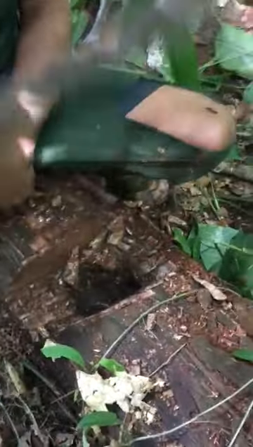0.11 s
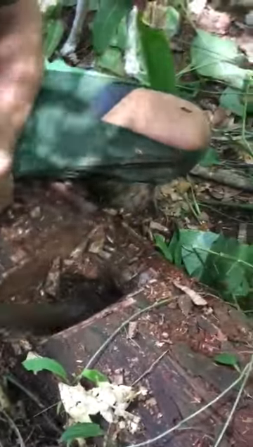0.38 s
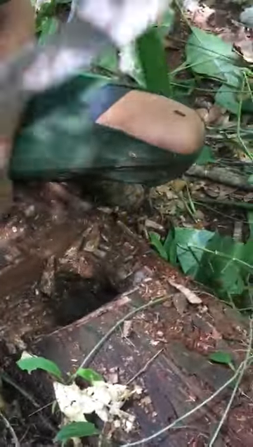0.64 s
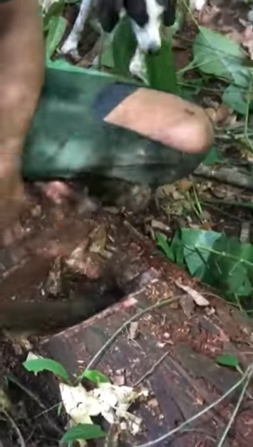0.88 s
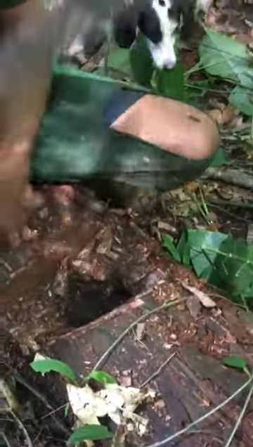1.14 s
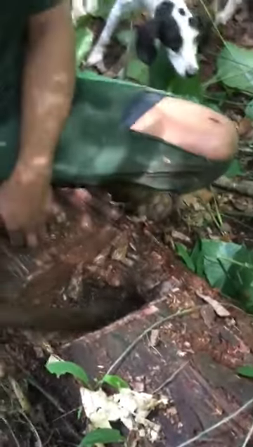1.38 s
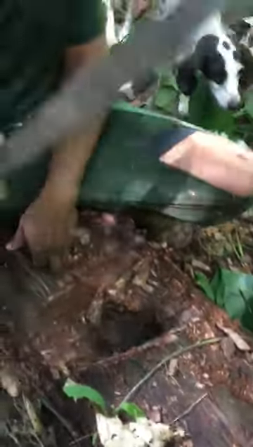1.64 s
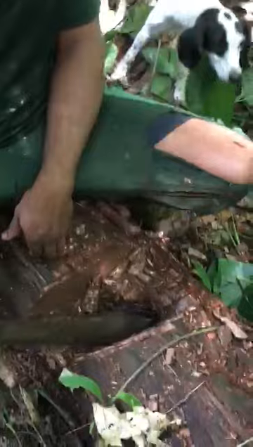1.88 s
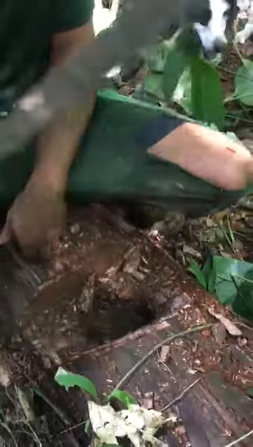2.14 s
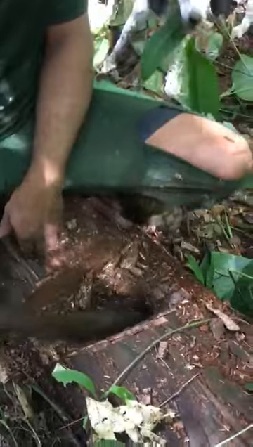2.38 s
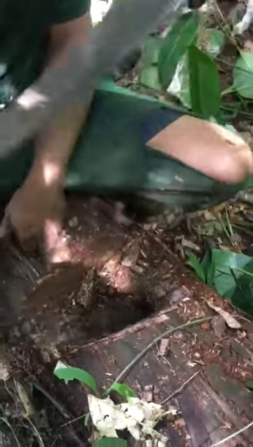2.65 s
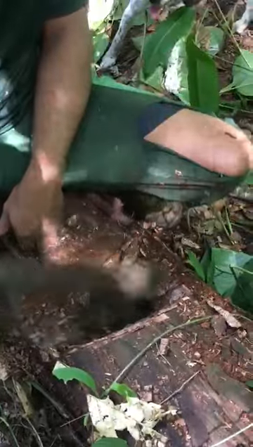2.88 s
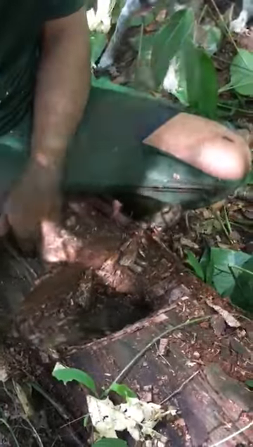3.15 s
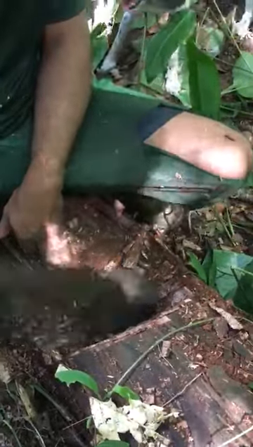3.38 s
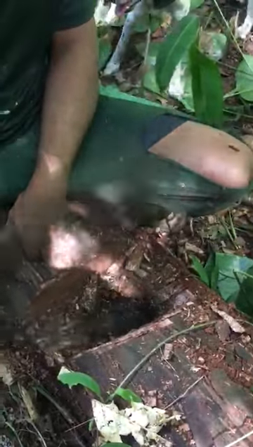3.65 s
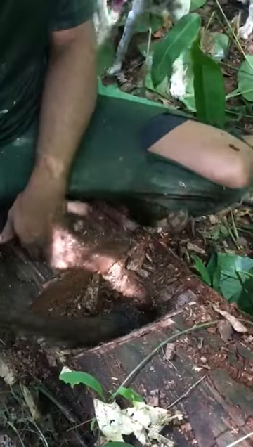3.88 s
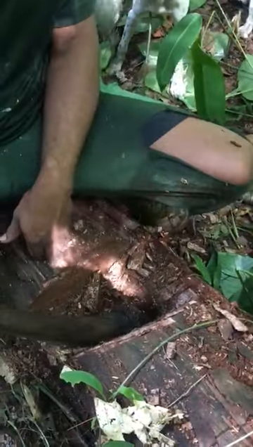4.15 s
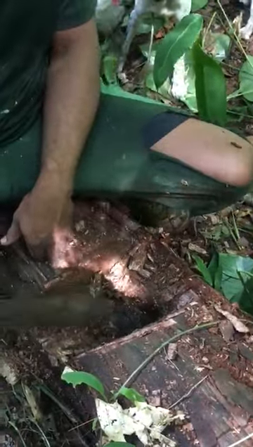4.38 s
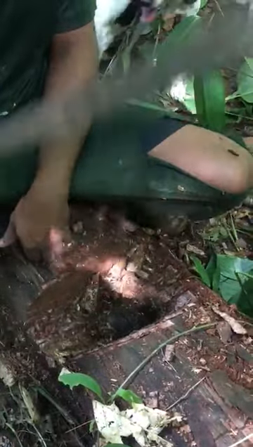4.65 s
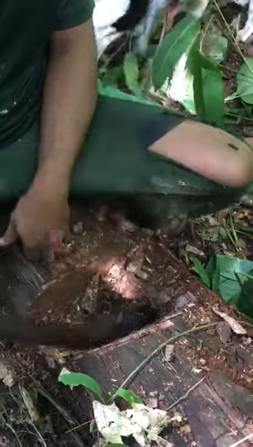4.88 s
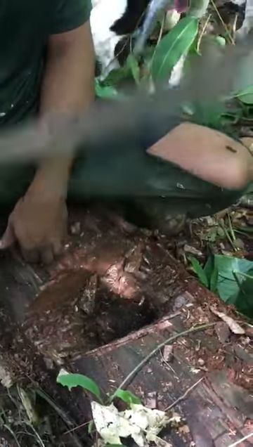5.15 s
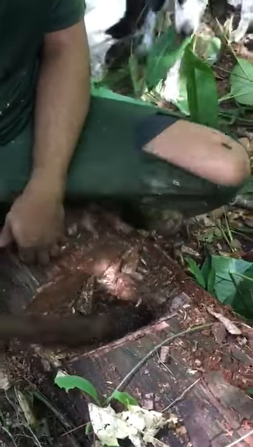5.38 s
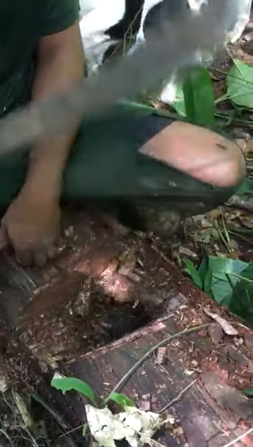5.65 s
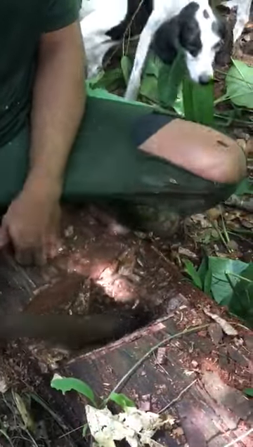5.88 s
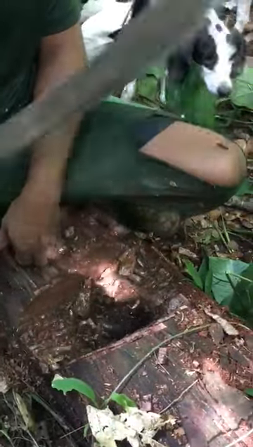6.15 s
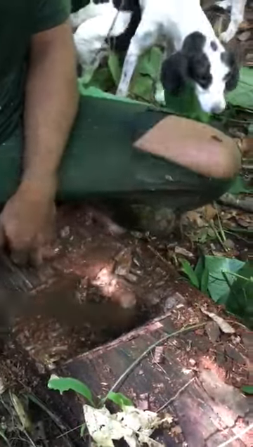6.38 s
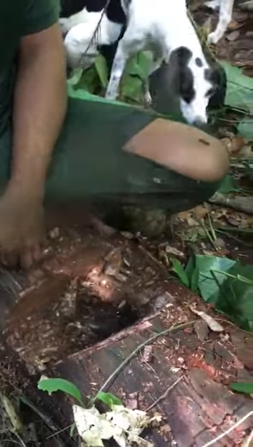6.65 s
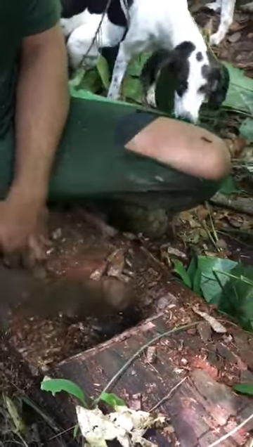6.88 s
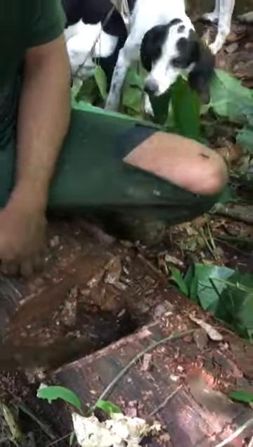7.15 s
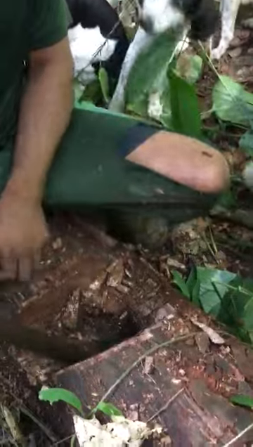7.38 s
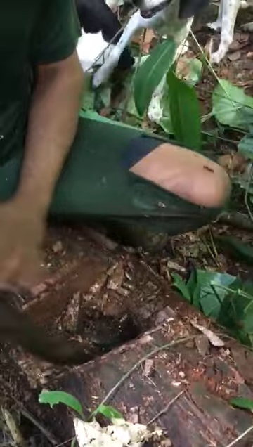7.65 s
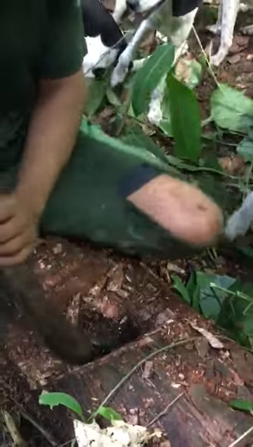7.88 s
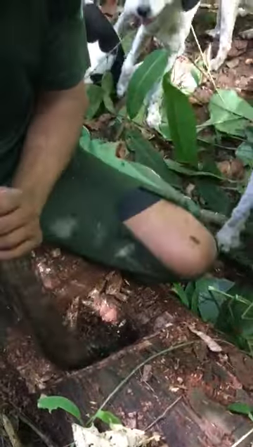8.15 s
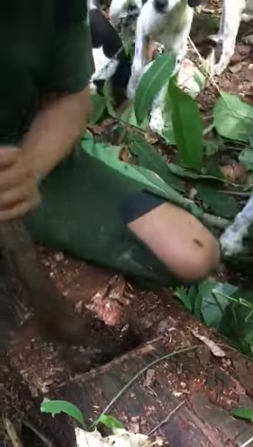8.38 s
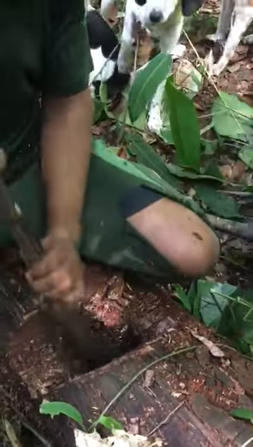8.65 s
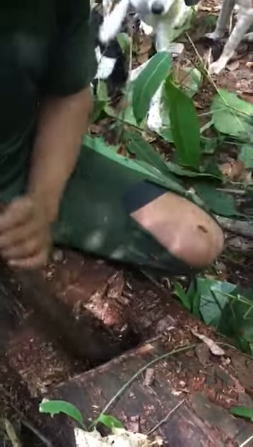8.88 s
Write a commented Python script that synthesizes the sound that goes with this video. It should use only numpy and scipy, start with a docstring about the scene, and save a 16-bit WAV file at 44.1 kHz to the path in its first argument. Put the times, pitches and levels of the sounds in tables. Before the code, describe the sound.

A machete chops steadily into a rotten hollow log with crunchy, woody thuds, crumbs scattering, then the blade scrapes and rummages inside the hole.

```python
"""A machete chops a rotten, hollow log on a forest floor: each cut crunches (swelling noise bands), knocks and
thuds (decaying log modes), snaps fibres (short sine bursts); some cuts ring the blade (damped bending modes).
Crumbs and litter rustle (noise kicked by random breaks), twigs tick (noise bursts); later the blade scrapes in
the hole. A dog nearby squeaks and whimpers once; thin far whistles drift (gliding, fluttering tones)."""
import sys
import numpy as np
from scipy import signal
from scipy.fft import rfft, irfft, next_fast_len
from scipy.io import wavfile
from scipy.ndimage import uniform_filter1d

SR = 44100
rng = np.random.default_rng(int(sys.argv[2]) if len(sys.argv) > 2 else 0)


def inscribe(sig):
    """Save sig as 16-bit PCM at rate SR to the path in sys.argv[1].

    A 1-D sig is mono; a 2-D sig holds one channel per row.
    Samples are clipped to [-1, 1] before scaling.
    """
    pcm = np.round(np.clip(np.atleast_2d(sig).T, -1, 1) * 32767)
    wavfile.write(sys.argv[1], SR, pcm.astype(np.int16))


def how_loud(loudness_db):
    """Turn decibels into a plain amplitude multiplier (0 dB gives 1, 20 dB gives 10)."""
    steps = np.asarray(loudness_db, float) / 20
    return 10 ** steps


N = 397454

# cuts: (time [s], time to sink in [s], relative crunch level [dB], knock pitch [Hz], knock level [dB],
# relative thud level [dB])
CHOPS = [(0.391, 0.01284, 1.5, 870, -23.5, -19), (0.9234, 0.01104, -1.5, 610, -18, -12.5),
         (1.402, 0.01146, -1.5, 743, -21, -15.5), (1.9096, .0107, 0, 583, -17.5, -11.5),
         (2.377, 0.0101, 2.5, 642, -16, -18), (2.831, .0102, 0, 699, -15.5, -13),
         (3.2857, 0.0113, 2, 710, -26, -12.5), (3.778, 0.01062, 1, 636, -21, -14.5),
         (4.9172, 0.0116, -1, 593, -16, -16), (5.4135, 0.0138, 2, 475, -31, -15.5),
         (5.885, .0105, -1, 635, -19, -12.5), (6.342, .014, 1.5, 810, -24, -14.5),
         (6.781, .0112, 1, 730, -16, -11.5), (7.2365, 0.01745, 0, 766, -23, -16.5)]
# crunch of the edge, duller as the blade slows: (centre [Hz], relative level [dB], time to peak at usual sinking [s])
CRUNCH = [(1400, 1, 0.0037), (2600, 0.5, 0.0021), (4280, -13.5, 0.0052), (8100, -11.5, 0.0013),
          (11300, -0.5, 0.0024)]
# modes of the hollow log: (mean frequency [Hz], mean relative level [dB], time to peak [share of stopping time])
LOG = [(95.5, -20.5, 0.93), (167.3, -8.5, 0.76), (240.5, -7.5, 0.91), (293, -6.5, 0.75), (400.6, -11, 0.77)]
# fibres snapping during the cuts: (time [s], pitch [Hz], peak level [dB])
FIBRES = [(.392, 1424, -5.5), (0.9265, 3020, -10), (.9263, 1040, -17), (1.405, 2650, -14),
          (1.4046, 1496, -8), (1.9118, 2090, -11), (2.378, 2320, -7.5), (2.3817, 1084, -9.5),
          (2.8321, 1425, -5), (3.2878, 1050, -5.5), (3.7817, 1860, -9), (4.9197, 765, -11),
          (5.4159, 1037, -10.5), (5.886, 2050, -7.5), (5.8873, 1507, -6), (6.343, 1075, -11.5),
          (6.7869, 1785, -10), (7.2448, 1680, -5)]
# modes of the steel blade: (frequency [Hz], free t60 [s])
BLADE = [(3714, .38), (4791, .16), (6228, .24), (8053, .13), (10790, .16)]
# cuts that ring the steel: (time [s], reference level at 30 ms [dB], landing place [share of blade length],
# time until wood or hand mutes it [s])
RINGS = [(0.923, -43, .93, .044), (1.402, -47, .622, .049), (1.91, -47, .55, .076), (2.377, -45, .752, .19),
         (3.285, -45, .546, .045), (5.414, -47, .818, .05), (5.885, -38.5, .416, .28),
         (6.343, -36, .566, .045), (6.782, -41, .27, .046)]
# twigs, crumbs, light blade contacts: (time [s], relative level [dB], pitch [Hz], spread [octaves], length [s])
TICKS = [(0.459, -41, 970, 0.086, 0.055), (0.46, -42.5, 3520, 0.11, 0.038), (.7, -42, 1100, 0.23, .05),
         (.75, -42, 1200, 0.14, 0.035), (0.773, -32, 1020, 0.25, 0.022), (1.002, -44, 1470, 1.1, 0.0092),
         (1.034, -41, 7060, .6, 0.019), (1.106, -39.5, 5000, 0.65, 0.0086), (1.128, -40, 6000, 1.1, .006),
         (1.447, -35.5, 6000, 1.8, 0.006), (1.942, -40, 7000, 1.1, 0.016), (3.38, -39, 2880, 1.8, 0.013),
         (3.9634, -35, 2310, 0.96, 0.0061), (4.192, -45, 4930, 1.2, .004), (5.1, -38, 2460, 0.81, 0.0045),
         (5.158, -37, 8500, 0.33, 0.0025), (5.691, -34, 1710, 0.29, 0.0062),
         (5.753, -38.5, 3240, 0.73, 0.0036), (6.265, -30.5, 4000, 1.9, 0.007),
         (6.92, -43, 4030, 1.7, 0.0049), (7.462, -41.5, 2000, 1.16, 0.011), (7.587, -42, 4000, 0.88, 0.004),
         (7.681, -39.5, 3000, 1.8, 0.0095), (7.741, -36.5, 940, 0.59, 0.012),
         (7.92, -31.5, 1400, 0.65, 0.0064), (7.934, -32, 2050, 0.75, 0.011),
         (7.973, -25.5, 1050, 0.25, 0.0054), (8.009, -34.5, 5300, 0.65, 0.0048),
         (8.051, -36.5, 6000, 1.7, 0.0034), (8.061, -35, 2800, .9, .005), (8.08, -27, 4350, 0.17, 0.0091),
         (8.097, -24.5, 4220, .14, 0.021), (8.103, -33, 3520, .2, 0.0065), (8.112, -27.5, 4600, .12, 0.016),
         (8.115, -29, 6440, .5, .008), (8.126, -34, 4400, 0.22, .007), (8.114, -31, 1510, 1.46, 0.016),
         (8.398, -31, 2600, 0.41, 0.0045), (8.47, -36.5, 1560, 0.64, 0.043),
         (8.606, -29, 2500, 1.9, 0.0028), (8.619, -35, 3750, 0.78, 0.011),
         (8.655, -19.5, 2760, 1.17, 0.0062), (8.661, -22, 2640, 1.3, 0.013),
         (8.978, -36.5, 1510, 0.9, 0.0047), (8.990, -29, 3000, 2, 0.003)]
# low bumps of chips and blade against the log: (time [s], level [dB], length [s])
BUMPS = [(0.477, -43, 0.014), (0.069, -60, 0.036), (0.773, -42, 0.026), (.815, -45, 0.0074),
         (0.966, -41, 0.021), (1.449, -30, 0.0071), (3.963, -49.5, 0.0077), (4.35, -54.5, 0.011),
         (5.752, -47, 0.0057), (5.946, -35, 0.0063), (6.268, -54, .007), (7.458, -58, 0.032),
         (7.685, -45, 0.015), (7.737, -49, 0.012), (8.661, -33, 0.0052)]
# spectra of the litter's three bands: (frequency [Hz], relative density [dB per Hz])
RUMBLE = [(15, -46.5), (25, -17.5), (43, -0.5), (134, 0), (373, -5.5), (400, -18.5), (520, -44),
          (880, -120)]
RUSTLE = [(240, -43.5), (400, -3.5), (779, -3.5), (996, -2.5), (2500, -8), (3250, -17.5), (5500, -120)]
CRACKLE = [(1470, -24.5), (2500, -7), (3150, -3.5), (4510, -6), (4920, -8), (9660, -11), (12000, -17.5),
           (15600, -48), (22000, -120)]
# mean litter level at rest: (rumble [dB], rustle [dB], crackle [dB])
QUIET_DB = (-61.5, -58, -64)
# what a cut shakes loose: (rumble [dB], rustle [dB], crackle [dB]), and the t60 of each [s]
DEBRIS_DB = (-32.5, -36.5, -43)
DEBRIS_T60_S = (0.27, 0.28, 0.33)
# leaves and air stirring up to a cut: (rumble [dB], rustle [dB], crackle [dB])
SWING_DB = (-59, -59, -63)
# litter stirred by paws, hands and blade: (middle [s], half length [s], rustle level [dB], crackle over it [dB])
STIRS = [(0.0, 0.096, -55, -2), (0.194, 0.029, -50.5, -8), (0.264, 0.02, -52.5, -5),
         (0.454, 0.041, -48, -3.5), (.70, 0.05, -52, -9), (0.782, 0.045, -40, -6),
         (1.015, 0.027, -46, -1.5), (1.11, .05, -48, -2.5), (1.285, 0.024, -53, -22),
         (1.676, 0.024, -55, -9), (1.385, 0.015, -59, 3), (2.242, 0.07, -60, -3.5),
         (2.34, 0.046, -53, -3.5), (3.122, 0.042, -57.5, -4), (3.56, 0.051, -56.5, -4),
         (3.734, 0.055, -60, 1), (4.084, 0.024, -61.5, -19), (4.2, 0.013, -65.5, 5),
         (4.323, 0.02, -54.5, -5), (4.44, 0.02, -62, -8), (4.562, 0.045, -55.5, -6),
         (4.893, 0.059, -57, -3), (5.153, 0.052, -49, -2.5), (5.384, 0.024, -44, -4),
         (5.476, 0.036, -48.5, -1.5), (5.715, 0.15, -56, -5), (5.875, 0.017, -59, -9),
         (6.16, 0.032, -57, 2), (6.288, 0.038, -45, 1), (6.626, 0.12, -59, -0.5), (6.921, 0.019, -54, -2),
         (7.469, 0.022, -45, -6), (7.606, .025, -54, 1), (7.665, 0.023, -47, 0), (7.754, 0.022, -54, -6),
         (7.943, 0.062, -49, -4), (8.115, 0.013, -40.5, 11.5), (8.395, 0.022, -47, -3),
         (8.497, 0.041, -47.5, -1), (8.62, 0.0075, -58, -19), (8.703, 0.021, -43, 0), (8.85, 0.021, -53, 5),
         (8.98, 0.041, -46, -0.5)]
# blade rummaging in the hole: (time [s], rustle level [dB], crackle level [dB])
RUMMAGE = [(7.38, -61, -64), (7.596, -51.5, -53), (7.942, -61, -61), (8.07, -50.5, -46.5),
           (8.228, -49, -53.5), (8.468, -64, -63), (8.642, -47, -43.5), (9.01, -56, -59.5)]
# dog's squeak, lower nostril note: (time [s], pitch [Hz], level [dB])
SQUEAK = [(0.095, 3830, -57), (0.133, 3950, -34.5), (0.155, 3764, -32.5), (0.17, 3750, -52),
          (0.2, 3450, -56)]
# dog's squeak, upper nostril note: (time [s], pitch [Hz], level [dB])
SQUEAL = [(0.095, 7540, -82), (0.101, 7500, -50), (0.137, 7960, -41), (0.181, 6600, -52),
          (0.195, 6800, -63)]
# dog's whimper: (time [s], pitch [Hz], level [dB], third partial level [dB])
WHIMPER = [(0.71, 727, -57, -68), (0.744, 655, -25.5, -38.5), (0.756, 606, -29, -53),
           (0.775, 650, -65, -36)]
# thin far whistles: (start [s], length [s], first pitch [Hz], last pitch [Hz], level [dB])
WHISTLES = [(1.48, .24, 8600, 9100, -71), (1.678, 0.14, 6800, 6650, -68), (2.03, 0.19, 8200, 7000, -65.5),
            (2.624, 0.22, 7400, 8900, -75), (5.2, 0.22, 8600, 9500, -65), (5.805, .085, 5700, 6200, -67)]


def unit(x):
    """Scales to rms 1."""
    return x / np.sqrt(np.mean(x ** 2) + 1e-20)


def filtered(x, response):
    """Multiplies the spectrum by a response of frequency."""
    size = next_fast_len(x.shape[-1] + 4096)
    hz = np.fft.rfftfreq(size, 1 / SR) + 1  # avoids 0 Hz
    return irfft(rfft(x, size) * response(hz), size)[..., :x.shape[-1]]


def band(size, hz, octaves):
    """Noise of rms 1, Gaussian in octaves around a centre frequency."""
    noise = rng.standard_normal(size)
    return unit(filtered(noise, lambda f: np.exp(-.5 * (np.log2(f / hz) / octaves) ** 2)))


def swell(t, peak_s, order=2):
    """Rises to 1 at peak_s, then dies away."""
    u = t / max(peak_s, 1e-4)
    return (u * np.exp(1 - u)) ** order


def add(track, start_s, sound):
    """Mixes a sound into the track at start_s."""
    part = track[max(round(start_s * SR), 0):][:len(sound)]
    part += sound[:len(part)]


def crunching(t, stretch, splinters):
    """Edge breaking in: noise bands that peak in turn, later in a slower cut."""
    crunch = np.zeros(len(t))
    for hz, db, peak_s in CRUNCH:
        crunch += how_loud(db - 14) * swell(t, stretch * peak_s, order=4) * band(len(t), hz, octaves=0.94)
    return splinters * crunch


def booming(t, stop_s):
    """Hollow log: all modes swing inwards together at the moment the blade stops."""
    boom = np.zeros(len(t))
    for hz, db, share in LOG:
        level = how_loud(db + rng.normal(0, 0.44))
        mode_hz = hz * rng.normal(1, 0.03)
        boom -= level * swell(t, share * stop_s, order=4) * np.cos(2 * np.pi * mode_hz * (t - stop_s))
    return boom


def chops():
    """The edge crunches in, wood knocks while the blade sinks, the hollow booms as it stops, crumbs fall."""
    usual_sink_s = 0.0093
    out, t = np.zeros(N), np.arange(SR // 3) / SR
    for s, sink_s, crunch_db, knock_hz, knock_db, thud_db in CHOPS:
        stop_s = sink_s + 0.0013
        splinters = 1 + 0.4 * band(len(t), 430, octaves=1.05)  # fibres give way unevenly
        crunch = crunching(t, sink_s / usual_sink_s, splinters)
        crumb_level = how_loud(-14.5 - 60 * t / 0.047) * (1 - np.exp(-(t / 0.0025) ** 2))
        crumbs = crumb_level * splinters * band(len(t), 920, octaves=1.71)
        sinking = (1 - np.exp(-t / 0.0015)) / (1 + (t / (1.38 * stop_s)) ** 7)
        knock = sinking * band(len(t), knock_hz, octaves=0.23)
        boom = booming(t, stop_s)
        shudder_level = how_loud(-10.5 - 60 * t / .12) * (1 - np.exp(-t / 0.0036))
        shudder = shudder_level * band(len(t), 170, octaves=0.92)
        cut = how_loud(crunch_db) * (crunch + crumbs)
        cut += how_loud(knock_db) * knock + how_loud(thud_db + 5.5) * (boom + shudder)
        add(out, s - .0015, cut)
    return out


def fibres():
    """Tough fibres snap: a few cycles at each pitch in a Gaussian envelope."""
    snap_s = 0.0014
    out, t = np.zeros(N), np.arange(-SR // 100, SR // 100) / SR
    for s, hz, db in FIBRES:
        cycles = np.sin(2 * np.pi * hz * t + rng.uniform(0, 2 * np.pi))
        add(out, s + t[0], how_loud(db) * np.exp(-.5 * (t / snap_s) ** 2) * cycles)
    return out


def blade():
    """A mode rings less the nearer the blow lands to a node; the loosely held steel warbles until muted."""
    first_order, mode_fall_db = 9, 4  # bending order of the lowest mode; loss from mode to mode
    out, t, k = np.zeros(N), np.arange(SR // 3) / SR, np.arange(len(BLADE))
    for s, db, place, mute_s in RINGS:
        shape = np.cos(np.pi * (first_order + k + .5) * place - np.pi / 4)
        gains = how_loud(db - mode_fall_db * k) * shape
        ring = np.zeros(len(t))
        for (hz, t60_s), gain in zip(BLADE, gains):
            mode = np.sin(2 * np.pi * hz * t + rng.uniform(0, 2 * np.pi))
            warble = 1 + .15 * band(len(t), 12, octaves=.8)
            ring += gain * how_loud(-60 * (t - .03) / t60_s) * mode * warble
        add(out, s, ring / (1 + (t / mute_s) ** 8))
    return out


def thump(t, length_s):
    """Low noise burst of a light contact."""
    return band(len(t), 140, octaves=1.0) * swell(t, length_s / 2 + 0.001, order=1)


def ticks():
    """Short dry snaps and scuffs, each with a dull body under it, and low bumps."""
    body_db = -28
    out, t = np.zeros(N), np.arange(SR // 6) / SR
    for s, db, hz, spread, length_s in TICKS:
        grit = 1 + .3 * band(len(t), 250, octaves=1.0)  # crumbling makes a scuff uneven
        snap = grit * band(len(t), hz, max(spread, .05)) * swell(t, length_s / 3, order=1)
        add(out, s - .0005, how_loud(db - 3.5) * snap + how_loud(db + body_db) * thump(t, length_s))
    for s, db, length_s in BUMPS:
        add(out, s - .0005, how_loud(db) * thump(t, length_s))
    return out


def stirring():
    """Gains of the three bands: rest, swing and debris of cuts, stirs and rummaging add up as powers."""
    drift_db, swing_s, stir_rumble_db = 1.2, .03, -5  # common drift at rest; rumble relative to rustle
    time = np.arange(N) / SR
    column = lambda values: np.reshape(values, (3, 1))
    power = how_loud(2 * (column(QUIET_DB) + drift_db * band(N, 6.5, octaves=0.67)))
    for s, *_ in CHOPS:
        near = slice(round((s - .2) * SR), round((s + .4) * SR))
        since = time[near] - s
        debris = how_loud(2 * (column(DEBRIS_DB) - 60 * np.abs(since) / column(DEBRIS_T60_S)))
        swing = how_loud(2 * column(SWING_DB)) * np.exp(-np.abs(since) / swing_s)
        power[:, near] += np.where(since > 0, debris, swing)
    for s, half_s, db, crackle_db in STIRS:
        levels_db = db + column([stir_rumble_db, 0, crackle_db])
        power += how_loud(2 * levels_db) * np.exp(-((time - s) / half_s) ** 2)
    s, *levels = np.transpose(RUMMAGE)
    power[1:] += [how_loud(2 * np.interp(time, s, db)) * (time > s[0]) for db in levels]
    return np.sqrt(power)


def litter():
    """Dry leaves and crumbling wood: noise kicked by small random breaks, each band swelling in patches."""
    breaks = (rng.random(N) < 150 / SR) * how_loud(3.36 * rng.exponential(1, N))  # 150 per second
    kicks = signal.lfilter([1], [1, -np.exp(-1 / (0.0023 * SR))], breaks)
    out = np.zeros(N)
    for gain, spectrum, grain in zip(stirring(), (RUMBLE, RUSTLE, CRACKLE), (.05, .25, .4)):
        hz, colour_db = np.transpose(spectrum)
        z = signal.stft(rng.standard_normal(N), nperseg=512)[2]
        patches = uniform_filter1d(rng.standard_normal(z.shape), size=6, axis=0)  # over frequency
        patches = unit(uniform_filter1d(patches, size=7, axis=1))  # over time
        patchy = signal.istft(z * how_loud(2.9 * patches), nperseg=512)[1][:N]
        rough = patchy * (1 + grain * kicks)
        coloured = filtered(rough, lambda f: how_loud(np.interp(np.log(f), np.log(hz), colour_db)))
        out += gain * unit(coloured)
    return out


def tone(rows, multiples, rough, flutter_hz=50):
    """Gliding partials of unsteady loudness; silent outside the rows."""
    s, hz, *levels = np.transpose(rows)
    t = np.arange(s[0], s[-1], 1 / SR)
    phase = 2 * np.pi * np.cumsum(np.interp(t, s, hz)) / SR
    flutter = 1 - rough + rough * band(len(t), flutter_hz, octaves=0.64)
    sound = sum(how_loud(np.interp(t, s, db)) * np.sin(k * phase) for k, db in zip(multiples, levels))
    out = np.zeros(N)
    add(out, s[0], np.sqrt(2) * sound * flutter * signal.windows.tukey(len(t), .2))
    return out


def dog():
    """A two-note nasal squeak, then a low whimper; trunks and leaves scatter the voice back as a noise tail."""
    echo_db, echo_t60_s = -12, 0.19
    squeak = tone(SQUEAK, (1,), rough=0.24) + tone(SQUEAL, (1,), rough=0.83)
    voice = squeak + tone(WHIMPER, (1, 3), rough=0.078)
    t = np.arange(SR // 4) / SR
    tail = rng.standard_normal(len(t)) * how_loud(-60 * t / echo_t60_s) * (t > .012)
    return voice + how_loud(echo_db) * signal.fftconvolve(voice, tail / np.linalg.norm(tail))[:N]


def whistles():
    """Faint high glides far off, fluttering fast in loudness."""
    out = np.zeros(N)
    for s, length_s, first_hz, last_hz, db in WHISTLES:
        glide = [(s, first_hz, db), (s + length_s, last_hz, db)]
        out += tone(glide, (1,), rough=.85, flutter_hz=130)
    return out


def scene():
    """Everything at one microphone."""
    return (chops() + fibres() + blade() + ticks() + litter() + dog() + whistles())[None]


def roll_off(x):
    """The treble ends steeply here."""
    return signal.sosfilt(signal.butter(12, 12680, fs=SR, output="sos"), x)


def record(dry):
    """The input clips softly near full scale and drops the deepest bass and the top of the treble."""
    bass_hz, top_hz, floor_db = 40, 12110, -75.5
    clipped = dry / (1 + np.abs(dry / .86) ** 4) ** (1 / 4)
    treble_cut = lambda f: how_loud(floor_db) + 1 / (1 + (f / top_hz) ** 50)
    narrow = filtered(clipped, lambda f: treble_cut(f) / (1 + (bass_hz / f) ** 2))
    return roll_off(narrow)


dry = scene()
out = record(dry)
inscribe(out)
```